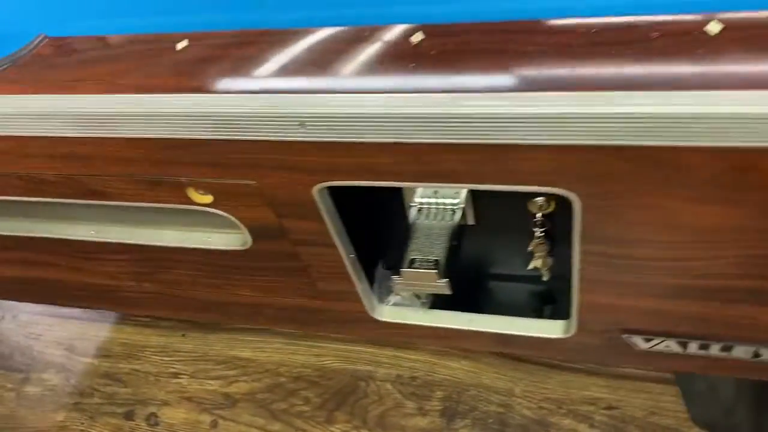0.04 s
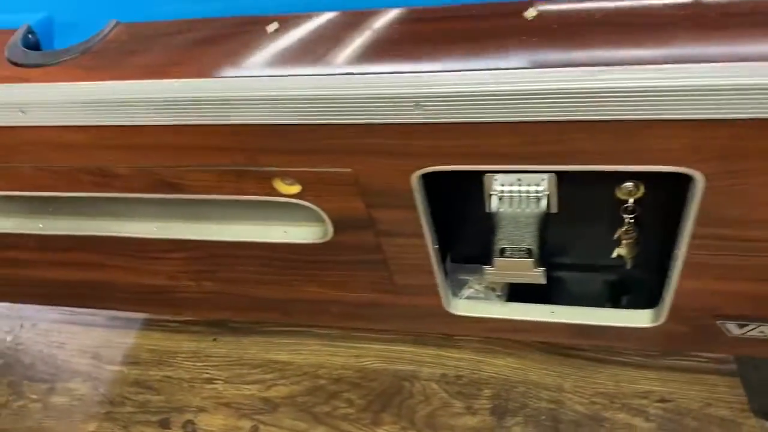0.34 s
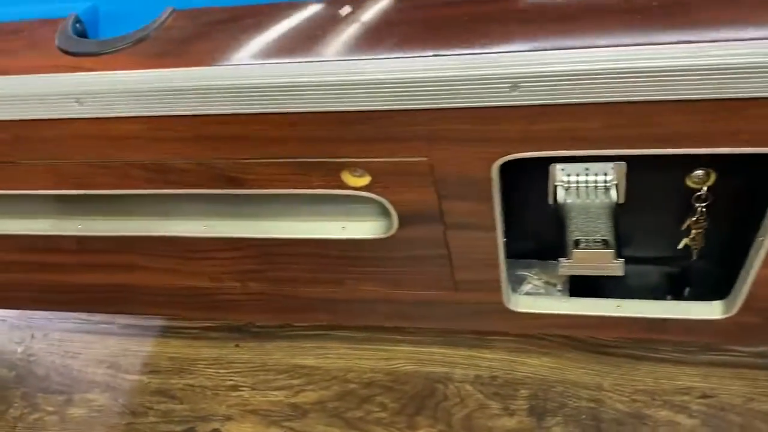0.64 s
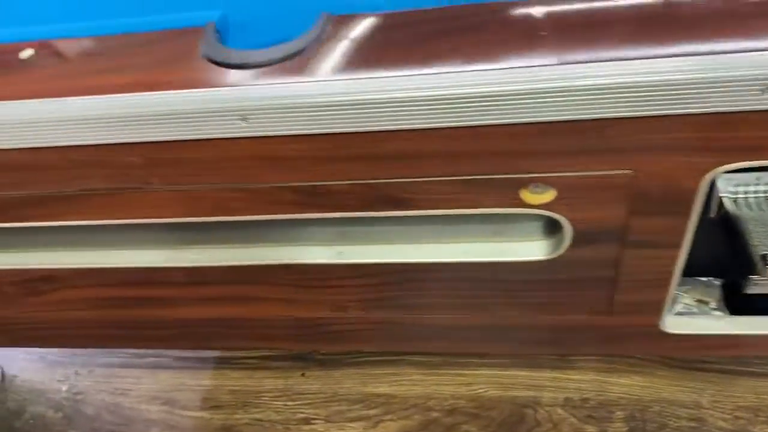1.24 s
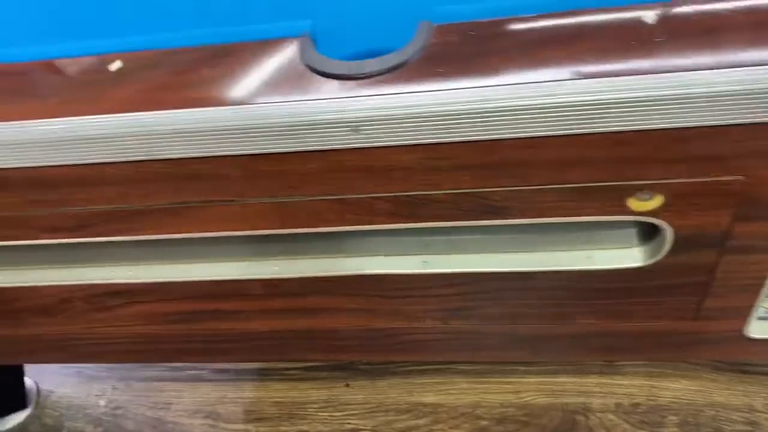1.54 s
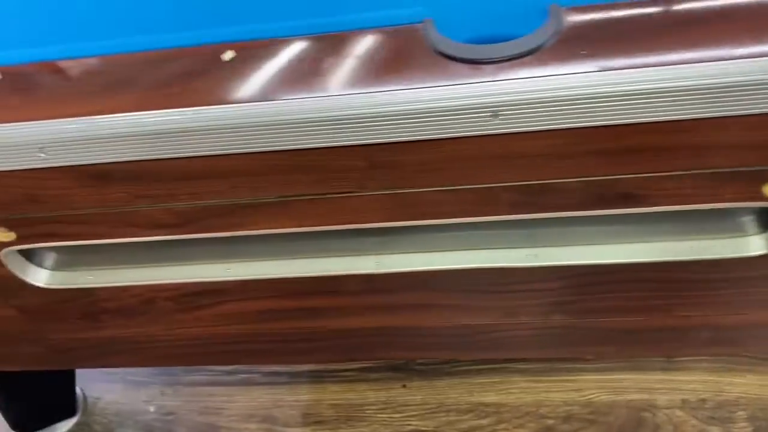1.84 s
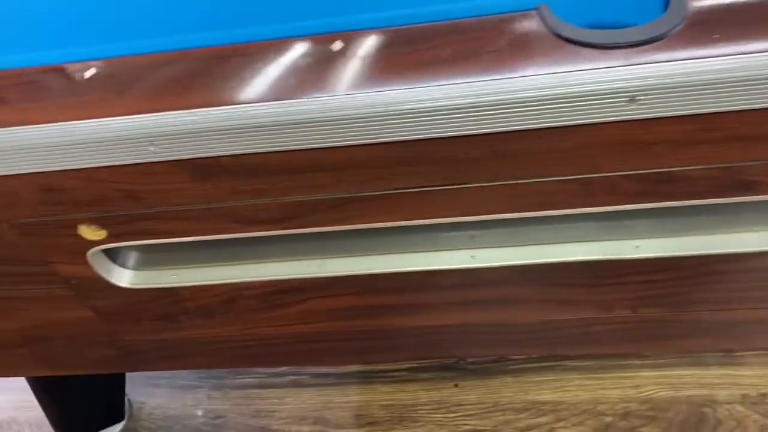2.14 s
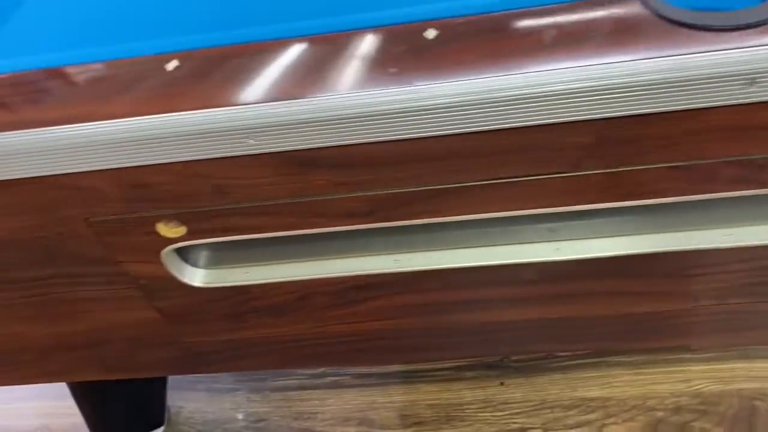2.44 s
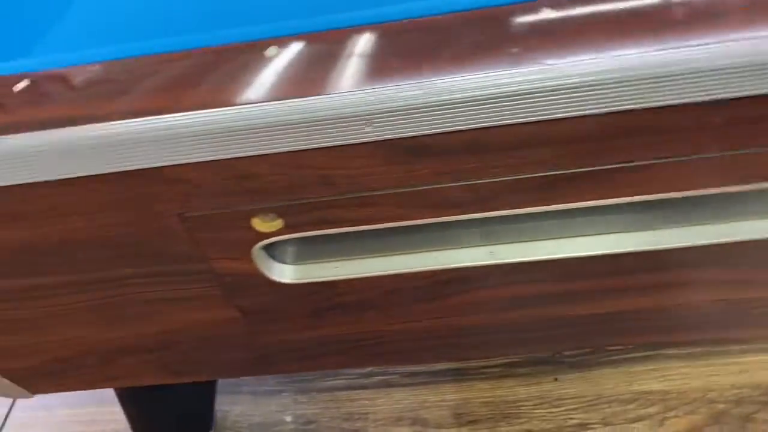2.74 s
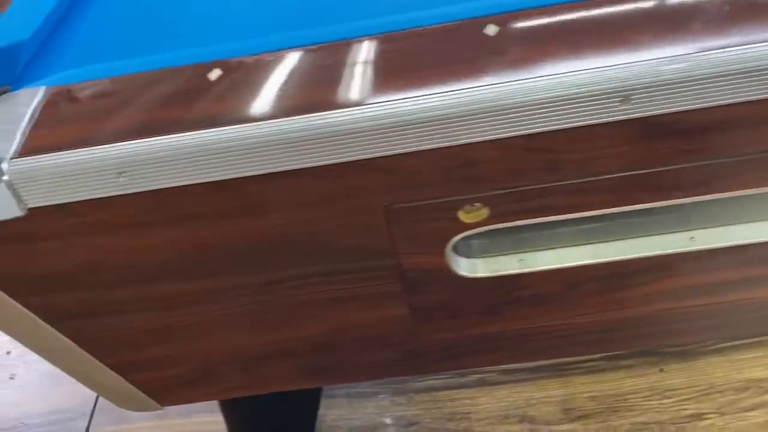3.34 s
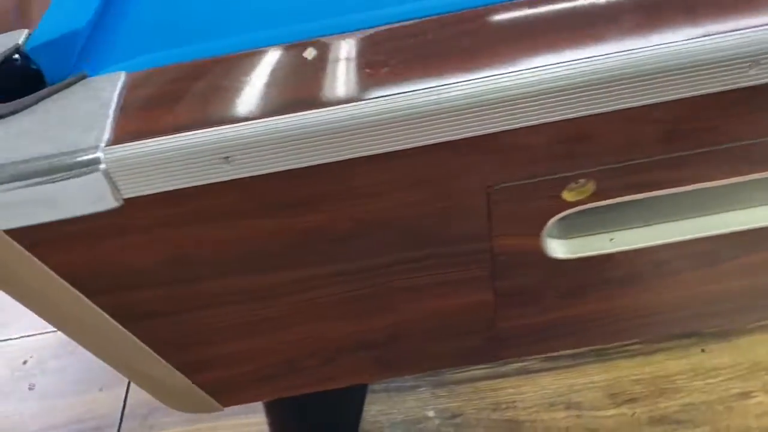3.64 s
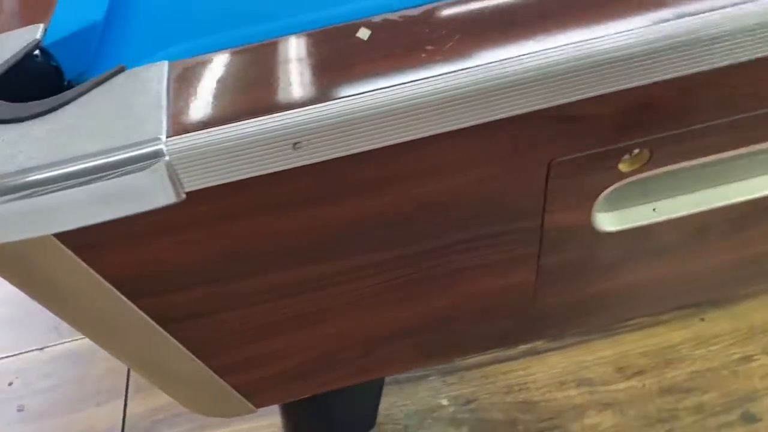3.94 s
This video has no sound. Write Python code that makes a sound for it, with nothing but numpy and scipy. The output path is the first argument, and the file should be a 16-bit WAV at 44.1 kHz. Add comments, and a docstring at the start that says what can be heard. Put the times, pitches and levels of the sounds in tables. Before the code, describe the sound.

Steady ventilation rush and machine hum indoors, with soft footsteps and clothing swishes.

```python
"""Motors and fans hum over a steady rush of ventilation air in a showroom.
Someone side-steps slowly with the microphone: clothes swish at each step, two footfalls thud on the
floor, and some tones swell and fade as the microphone crosses their standing waves.
The hand knocks softly on the microphone's case, and something small ticks once."""
import sys
import numpy as np
from scipy import signal
from scipy.fft import rfft, irfft
from scipy.io import wavfile

SR = 44100
rng = np.random.default_rng(int(sys.argv[2]) if len(sys.argv) > 2 else 0)


def digitize_waveform(pressure):
    """Quantize a signal to 16-bit integers and store it at the path in sys.argv[1].

    Rows of a 2-D input are taken as channels; values are limited to [-1, 1].
    """
    field = np.atleast_2d(pressure).T
    bounded = np.clip(field, -1, 1)
    quanta = np.round(bounded * 32767).astype(np.int16)
    wavfile.write(sys.argv[1], SR, quanta)


N = 176400
T = np.arange(N) / SR
BIN_HZ = np.arange(N // 2 + 1) * SR / N


def undb(db):
    """Decibels to gain."""
    return 10 ** (np.asarray(db) / 20)


def unit(x):
    """Scale to rms 1."""
    return x / np.sqrt(np.mean(x ** 2))


def pan(balance_db):
    """Port gains for a left minus right level."""
    return undb(np.array([[.5], [-.5]]) * balance_db)


def per_bin(points):
    """A (frequency, value) table interpolated along log frequency."""
    hz, value = np.array(points, float).T
    return np.interp(np.log(BIN_HZ + 1e-3), np.log(hz), value)


def drift(rate_hz):
    """Smooth random drift, rms 1."""
    points = 4000
    hz = BIN_HZ[:points // 2 + 1]
    lowpass = np.exp(-(hz / rate_hz) ** 2) * (hz > 0)
    slow = irfft(rfft(rng.standard_normal(points)) * lowpass, points)
    return np.interp(T, np.linspace(0, N / SR, points), unit(slow))


def burst(start_s, attack_s, decay_s):
    """Envelope: linear rise, exponential fall."""
    rise = np.clip((T - start_s) / attack_s, 0, 1)
    return rise * np.exp(-np.maximum(T - start_s - attack_s, 0) / decay_s)


# how alike the sound is at the two microphone ports (frequency [Hz], coherence [0-1])
PORT_COHERENCE = [(50, 1), (130, 1), (250, 0.84), (500, 0.073), (1000, 0.12), (2000, 0.22), (4000, 0.42),
                  (8000, 0.02), (14000, 0.3)]

def diffuse(spectrum, balance_db=0):
    """Coloured noise from all round the room, rms 1; alike at both ports only in the bass."""
    mid, side = rfft(rng.standard_normal((2, N)))
    coherence = per_bin(PORT_COHERENCE)
    ports = mid * np.sqrt(1 + coherence) + np.array([[1], [-1]]) * side * np.sqrt(1 - coherence)
    return unit(irfft(ports * undb(per_bin(spectrum)) * pan(balance_db), N))


# vent rush (frequency [Hz], relative density [dB])
AIR_SPECTRUM = [(25, -21), (35, -24), (50, -3), (85, -3.5), (105, -2.5), (145, -7.5), (190, 0), (270, -2.6),
                (350, -2.6), (450, -3.5), (600, -5), (1000, -5.5), (1500, -8.5), (2200, -14.1),
                (4000, -19.9), (5500, -22), (7300, -28.3), (8500, -33.5), (10000, -29.8), (12000, -35.5),
                (15000, -38)]
# how the ports hear the room (frequency [Hz], left minus right [dB])
PORT_BALANCE = [(60, -1), (200, -3), (400, -5), (800, -3.5), (1300, -.5), (2200, 2), (5000, 4.3),
                (7000, 2.9), (9000, 0), (15000, 0)]
AIR_DB, AIR_FLICKER_DB, TREBLE_FLICKER_DB = -37.5, .4, .8

def air():
    """An even rush from the vents; each octave flickers slightly on its own."""
    rush = rfft(diffuse(AIR_SPECTRUM, per_bin(PORT_BALANCE)))
    octave = np.clip(np.log2(BIN_HZ / 60 + 1e-9), 0, 8)
    out = 0
    for k in range(9):
        band = irfft(rush * np.maximum(1 - abs(octave - k), 0), N)
        flicker_db = TREBLE_FLICKER_DB if k == 8 else AIR_FLICKER_DB
        out += band * undb(flicker_db * drift(rate_hz=21))
    return out * undb(AIR_DB)


WAVER_HZ, LEFT_LAG_S = 8.2, 0.00051

def machine_tone(hz, unsteadiness):
    """One tone wavering in level and phase, rms 1; it reaches the left port later."""
    shared, left, right = (drift(WAVER_HZ) + 1j * drift(WAVER_HZ) for _ in range(3))
    waver = 1 + unsteadiness * (shared + .5 * np.array([left, right])) / np.sqrt(2)
    cycles = hz * (T - np.array([[LEFT_LAG_S], [0]])) + rng.random()
    return unit(np.real(waver * np.exp(2j * np.pi * cycles)))


# motor and fan tones (frequency [Hz], level [dB], right minus left [dB], unsteadiness [0-1])
HUM_TONES = [(64.04, -45, -3, 0.42), (120.5, -52, -4, 0.08), (466.5, -53.5, -7, 1), (564, -53.5, 10, 0.9),
             (616, -60, 27, 0.25), (636, -56.5, 2, 0), (696, -56.5, -5, 1), (773, -71, 16, 0.5),
             (903, -61, -4.5, 1)]
# standing waves along the path (frequency [Hz], list of (time [s], left [dB], right [dB]))
STANDING_WAVES = [(76.5, [(.1, -41, -40.5), (1.3, -39.5, -36.5), (2.4, -40, -38.5), (3.5, -40.5, -38),
                  (3.9, -45, -41.5)]), (126.5, [(.3, -44.5, -47), (1.8, -46, -48.5), (2.4, -49.5, -44.5),
                  (3.9, -50, -49)]), (153, [(.1, -58, -65), (.9, -43, -41.5), (1.2, -56, -58),
                  (1.6, -52, -46), (2.1, -78, -56.5)]), (229.5, [(.1, -51, -50), (.55, -41.5, -42),
                  (1.03, -53, -51), (1.25, -44, -37), (1.7, -51, -40.5), (1.95, -68, -64), (2.25, -46, -54),
                  (3.2, -46.5, -54), (3.8, -51, -37.5)]), (316.5, [(.05, -44, -41.5), (.55, -44, -38),
                  (1.05, -54, -39.5), (1.45, -76, -48), (1.73, -44.5, -51), (2.2, -43, -38),
                  (3.35, -51.5, -39.5), (3.9, -48, -53)]), (381.5, [(.15, -60, -52), (.43, -42, -40),
                  (.72, -56, -55), (.97, -40, -36.5), (1.32, -58, -50), (1.55, -42, -38.5), (1.8, -44, -49),
                  (2.8, -70, -49), (3.3, -58, -61), (3.8, -49, -40.5)]), (506.25, [(.1, -53.5, -45),
                  (.7, -59, -45), (1.05, -44.5, -45), (1.85, -53, -42), (2.35, -44, -46.5),
                  (2.85, -56, -42), (3.35, -40, -61), (3.95, -44.5, -55)])]

def machines():
    """Motors and fans hum; some tones swell and fade as the microphone crosses standing waves."""
    out = 0
    for hz, level_db, right_db, unsteadiness in HUM_TONES:
        out += undb(level_db) * unit(machine_tone(hz, unsteadiness) * pan(-right_db))
    for hz, path in STANDING_WAVES:
        times_s, left_db, right_db = np.array(path).T
        swell = undb([np.interp(T, times_s, left_db), np.interp(T, times_s, right_db)])
        out += swell * machine_tone(hz, unsteadiness=.06)
    return out


# small tick (frequency [Hz], relative density [dB])
TICK_SPECTRUM = [(400, -12), (1400, 3), (3000, -3), (6300, -8), (8500, -26), (15000, -32)]
TICK_DB = -31

def tick():
    """One short, bright tick of noise."""
    return undb(TICK_DB) * burst(start_s=2.9105, attack_s=.0007, decay_s=.005) * diffuse(TICK_SPECTRUM)


# knocks on the case (time [s], level [dB])
CASE_KNOCKS = [(.029, -28.5), (1.6736, -22.5), (1.6818, -31), (3.38, -35)]
# case modes (frequency [Hz], relative level [dB], t60 [s])
CASE_RESONANCES = [(167, -19, 0.07), (345.6, 4.5, 0.056), (417, -4.5, 0.02)]
CONTACT_S = 0.00085

def knocks():
    """A soft fingertip rings the damped modes of the microphone's case."""
    out = 0
    for start_s, level_db in CASE_KNOCKS:
        age_s = np.maximum(T - start_s, 0)
        ring = sum(undb(mode_db - 60 * age_s / t60_s) * np.sin(2 * np.pi * hz * age_s)
                   for hz, mode_db, t60_s in CASE_RESONANCES)
        out += undb(level_db) * ring * np.minimum(age_s / CONTACT_S, 1)
    return out * pan(balance_db=-4.5)


# one swish per step (start [s], hold [s], release [s], slide [dB], flick [dB])
STEP_SWISHES = [(0.017, 0.08, 0.093, -43, -46), (0.785, 0.078, 0.2, -45.5, -46),
                (1.655, 0.095, 0.13, -45, -55), (2.456, 0.13, 0.16, -46, -47),
                (3.37, 0.055, 0.12, -46, -53)]
# rubbing fabric (frequency [Hz], relative density [dB])
FABRIC_SPECTRUM = [(500, -27), (1000, -9.5), (1700, 9.5), (2500, 2), (5000, -2), (7500, -6.5), (14000, -9)]
SLIDE_ATTACK_S, FOLDS_DB, GRAIN_DB = 0.033, 1.5, 1.9

def clothes():
    """Fabric flicks as each step starts, slides unevenly over its folds, then comes to rest."""
    slide, flick = 0, 0
    for start_s, hold_s, release_s, slide_db, flick_db in STEP_SWISHES:
        rise = np.clip((T - start_s) / SLIDE_ATTACK_S, 0, 1)
        fall = np.clip(1 - (T - start_s - hold_s) / release_s, 0, 1)
        slide += undb(slide_db) * rise * fall
        flick += undb(flick_db) * burst(start_s, attack_s=.013, decay_s=.014)
    folds = undb(FOLDS_DB * drift(rate_hz=18))
    grain = undb(GRAIN_DB * drift(rate_hz=120))
    return (flick + slide * folds) * grain * diffuse(FABRIC_SPECTRUM, per_bin(PORT_BALANCE))


# footfalls (time [s], scuff [dB], thud [dB], boom [dB], ring [dB], left minus right [dB])
FOOT_IMPACTS = [(0.243, -29, -29.5, -30.5, -34, 0), (3.263, -34, -31.5, -39.5, -44, -4)]
# heel scuff, floor ring, sole thud, floor boom: each (frequency [Hz], relative density [dB])
SCUFF_SPECTRUM = [(100, -20), (300, 8), (480, 2), (620, 0.5), (1250, -2), (2000, -15), (4500, -20),
                  (8000, -45), (15000, -60)]
RING_SPECTRUM = [(100, -50), (550, -15), (710, -1), (770, 1), (830, -20), (1050, -29), (4000, -70)]
THUD_SPECTRUM = [(90, -31), (150, 3.5), (200, -2), (300, -6.5), (450, -15), (2000, -65)]
BOOM_SPECTRUM = [(28, -26), (50, -2), (95, -2.5), (130, 0), (190, -16.5), (300, -21), (500, -5),
                 (4000, -80)]
SOLE_DELAY_S = 0.034

def feet():
    """The heel scuffs and the floor rings hollow; the sole thuds, and a boom trails into the room."""
    out = 0
    for start_s, scuff_db, thud_db, boom_db, ring_db, balance_db in FOOT_IMPACTS:
        scuff = undb(scuff_db) * diffuse(SCUFF_SPECTRUM, balance_db)
        ring = undb(ring_db) * diffuse(RING_SPECTRUM, balance_db)
        thud = undb(thud_db) * diffuse(THUD_SPECTRUM, balance_db)
        boom = undb(boom_db) * diffuse(BOOM_SPECTRUM)
        out += (scuff + ring) * burst(start_s, attack_s=.015, decay_s=.061)
        out += thud * burst(start_s + SOLE_DELAY_S, attack_s=.0098, decay_s=.07)
        out += boom * burst(start_s, attack_s=.03, decay_s=.11)
    return out


def scene():
    """The room and the person moving in it."""
    return machines() + air() + clothes() + feet() + knocks() + tick()


LOW_CUT_HZ, HIGH_CUT_HZ = 39, 15500

def record(dry):
    """The recorder cuts the deepest rumble and the top treble."""
    highpass = signal.butter(3, LOW_CUT_HZ, "highpass", fs=SR, output="sos")
    lowpass = signal.ellip(10, .2, 80, HIGH_CUT_HZ, fs=SR, output="sos")
    return signal.sosfilt(lowpass, signal.sosfilt(highpass, dry))


dry = scene()
out = record(dry)
digitize_waveform(out)
```